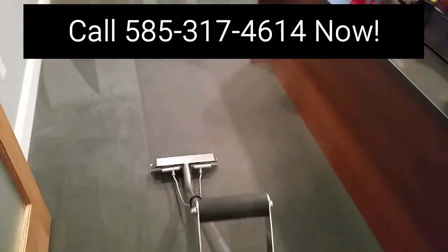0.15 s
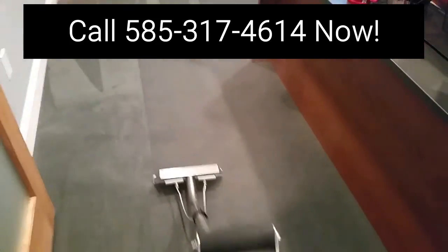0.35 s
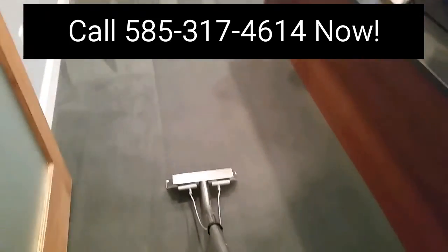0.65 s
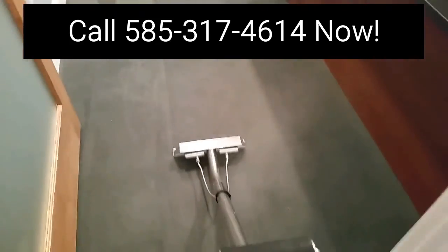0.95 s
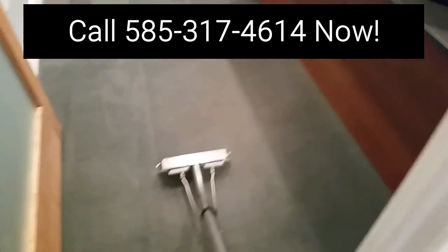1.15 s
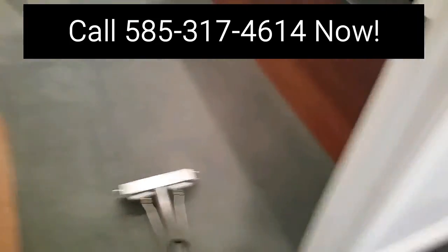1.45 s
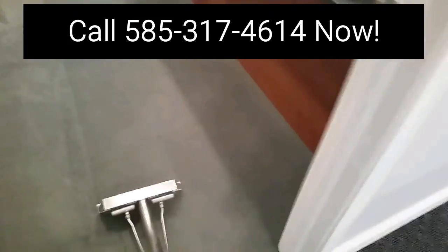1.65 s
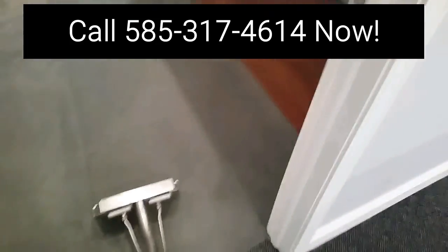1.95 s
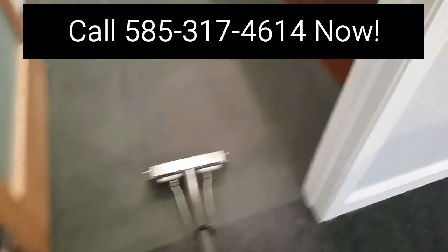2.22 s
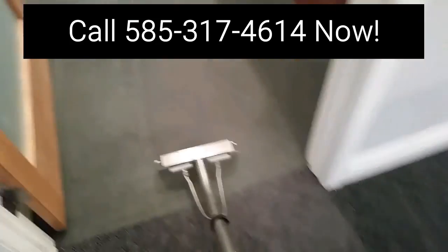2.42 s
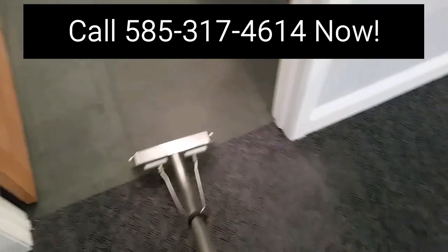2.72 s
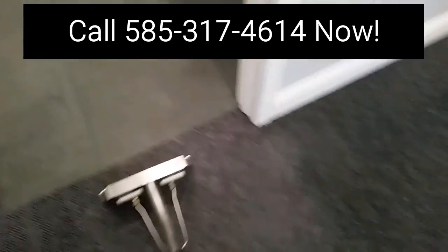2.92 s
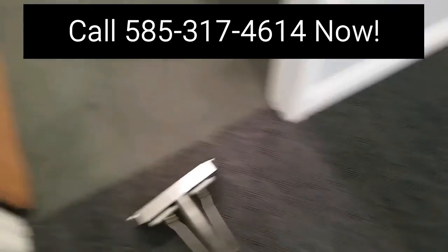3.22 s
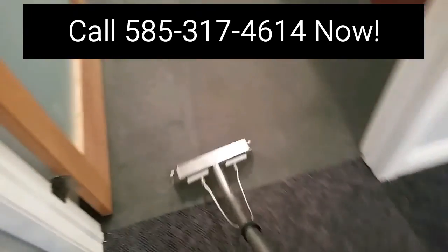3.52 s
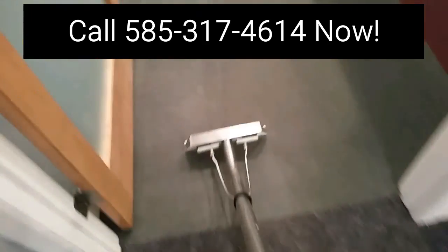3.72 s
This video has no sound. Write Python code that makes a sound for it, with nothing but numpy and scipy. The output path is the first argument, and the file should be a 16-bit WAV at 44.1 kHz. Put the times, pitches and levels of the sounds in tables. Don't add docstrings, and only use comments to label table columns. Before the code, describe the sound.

Close stereo microphone, left-heavy: steady vacuum suction with bright water spray over office carpet, one dull thump, a spray pause with juddering scrape and airy chirps, then hiss again over distant machine roar.

```python
import sys
import numpy as np
from scipy import signal
from scipy.fft import rfft, irfft, next_fast_len
from scipy.io import wavfile
from scipy.ndimage import uniform_filter1d, map_coordinates

SR = 44100
rng = np.random.default_rng(int(sys.argv[2]) if len(sys.argv) > 2 else 0)


def boost(x):
    u = np.asarray(x, float) / 20
    return 10 ** u


def log_audio(samples):
    frames = np.atleast_2d(samples).T
    limited = np.clip(frames, -1, 1)
    pcm = np.round(limited * 32767).astype(np.int16)
    wavfile.write(sys.argv[1], SR, pcm)


N = 170667

# (time [s], airflow [dB], slot resonance [Hz], resonance strength [dB])
AIRFLOW = [(0, -22.5, 1960, 15), (.9, -20.5, 2070, 5), (1.7, -21.5, 2180, 10), (2.3, -18.5, 2370, 0.5),
           (2.62, -20.5, 2300, -0.5), (2.7, -19, 2250, 6), (2.78, -21.5, 2300, 9), (2.87, -24, 2060, 12),
           (2.92, -19.5, 2120, 2), (3., -19, 2100, 2.5), (3.05, -23, 2200, 3), (3.19, -24.5, 2300, 4),
           (3.23, -28.5, 2320, 2), (3.3, -22.5, 2250, -1), (3.37, -21.5, 2200, 4), (3.43, -20, 2120, 3.5),
           (3.5, -21.5, 2090, 5), (3.87, -20, 2140, 1)]
# (frequency [Hz], likeness [0-1])
LIKENESS = [(60, 0.78), (130, 0.81), (290, 0.76), (630, 0.58), (1390, 0.32), (3040, 0.2), (6670, 0.11),
            (9000, .03)]


def unit(x):
    return x / np.sqrt(np.mean(x ** 2) + 1e-20)


def along(points, hz):
    f, v = np.transpose(points)
    return np.interp(np.log(hz + 1), np.log(f + 1), v)


def curves(rows, t):
    s, *cols = np.transpose(rows)
    return [np.interp(t, s, c) for c in cols]


def wobble(rate):
    knots = rng.standard_normal(int(N * rate / SR) + 4)
    return map_coordinates(knots, [np.arange(N) * rate / SR])


def filtered(x, response):
    m = next_fast_len(N + SR // 2)
    hz = np.fft.rfftfreq(m, 1 / SR)
    return irfft(rfft(x, m) * response(hz), m)[..., :N]


def bump(hz, centre_hz, width_hz):
    return 1 / (1 + (2 * (hz - centre_hz) / width_hz) ** 2)


def rush(colour, alike, patchy_db, moving_db=lambda hz, t: 0, extra=0):
    hop, comb_db = 128, 1.3
    hz, t, z = signal.stft(rng.standard_normal((2, N)) + extra, SR, nperseg=4 * hop, noverlap=3 * hop)
    hz = hz[:, None]
    patches = uniform_filter1d(rng.standard_normal(z.shape[1:]), size=6, axis=0)
    patches = uniform_filter1d(patches, size=12, axis=1)
    comb = uniform_filter1d(rng.standard_normal(z.shape[1:]), size=60, axis=1)
    gain_db = comb_db * unit(comb) + patchy_db * (0.74 + hz / 16000) * unit(patches)
    z = z * boost(gain_db + moving_db(hz, t))
    pair = signal.istft(z, nperseg=4 * hop, noverlap=3 * hop)[1][:, :N]

    def mid_side(f):
        angle = np.arccos(np.clip(along(alike, f), -1, 1)) / 2
        return boost(along(colour, f)) * np.array([np.cos(angle), np.sin(angle)])

    mid, side = filtered(pair, mid_side)
    return unit(np.array([mid + side, mid - side]))


def dip(hz, t):
    # (time [s], band gain [dB])
    echo_dip = [(0, 4), (1, -3), (2.2, -9.5), (2.6, -14), (2.9, -4), (3.2, -1.5), (3.87, -9.5)]
    return curves(echo_dip, t)[0] * bump(hz, centre_hz=587, width_hz=194)


def suction():
    # (frequency [Hz], density [dB per Hz])
    air_colour = [(250, -26), (500, -10), (1500, -10), (3000, -3), (3600, 0), (6000, -0.5), (7600, -14.5),
                  (15000, -24)]
    # (time [s], treble [dB])
    turn_away = [(2.6, -0.35), (2.72, -2.5), (2.88, -3.5), (2.97, -4.5), (3.1, 0.5), (3.2, 0), (3.3, -1),
                 (3.42, -4), (3.5, -0.5)]
    turn_hz, flutter_db = 4500, 0.7

    def resonances(hz, t):
        _, slot_hz, slot_db = curves(AIRFLOW, t)
        slot = slot_db * bump(hz, slot_hz, width_hz=280)
        pipe = 3 * bump(hz, centre_hz=4190, width_hz=480)
        treble = curves(turn_away, t)[0] / (1 + (turn_hz / (hz + 1)) ** 4)
        return slot + pipe + dip(hz, t) + treble

    flow_db = curves(AIRFLOW, np.arange(N) / SR)[0]
    flutter = flutter_db * (wobble(11) + wobble(20))
    return boost(flow_db + flutter) * rush(air_colour, LIKENESS, patchy_db=1.07, moving_db=resonances)


def spray():
    # (time [s], length [s], level [dB])
    valve_open = [
        (-.3, 2.96, -19.5),
        (3.468, .8, -21.5),
    ]
    # (frequency [Hz], density [dB per Hz])
    spray_colour = [(1500, -34), (3300, -15), (5000, -5), (6000, 1), (6900, -9), (8000, -17), (11000, -15),
                    (15000, -18.5)]
    open_s, shut_s, fade_db_per_s = 0.011, 0.036, 0.84
    drops_per_s, drop_hz, drop_db = 3000, 5700, -7.5
    t = np.arange(N) / SR
    gate = np.zeros(N)
    for s, length, db in valve_open:
        opening = np.clip((t - s) / open_s, 0, 1)
        closing = np.exp(-np.clip(t - s - length, 0, None) / shut_s)
        gate += boost(db - fade_db_per_s * (t - s)) * opening * closing
    hits = (rng.random((2, N)) < drops_per_s / SR) * rng.standard_normal((2, N))
    patter = boost(drop_db) * unit(filtered(hits, lambda f: bump(f, drop_hz, drop_hz)))
    unsteady = boost(0.2 * wobble(9.2) + 0.37 * wobble(21.99))
    return gate * unsteady * rush(spray_colour, LIKENESS, patchy_db=1.13, extra=patter)


def roar():
    # (frequency [Hz], density [dB per Hz])
    roar_colour = [(20, -23), (48, 7), (75, -6), (140, -3), (300, -4.5), (420, -10), (1500, -18.5),
                   (6000, -27), (15000, -25)]
    roar_db, fade_db_per_s = -38, 0.26
    follow, follow_hz = 0.27, 700

    def moving(hz, t):
        flow_db = curves(AIRFLOW, t)[0]
        upper = (1 - bump(hz, 0, 2 * follow_hz)) * (hz < 6 * follow_hz)
        return dip(hz, t) + follow * (flow_db - flow_db.mean()) * upper

    level_db = roar_db - fade_db_per_s * np.arange(N) / SR + 2.0 * wobble(4.9)
    return boost(level_db) * rush(roar_colour, LIKENESS, patchy_db=2.0, moving_db=moving)


def knocks():
    # (time [s], peak [dB], share of full ring length)
    floor_blows = [
        (0.222, -10, 1.),
        (2.651, -22, .45),
        (3.468, -16, 0.17),
    ]
    # (frequency [Hz], level [dB], 60 dB decay [s])
    floor_ring = [(92.5, 6.5, 0.39), (113, -1.5, 0.32), (137, 9.5, 0.15), (206, 3.5, 0.096),
                  (300, -5, 0.26), (375, -1.5, 0.081), (530, -4, 0.047), (920, -1, 0.013)]
    slow_cycles, slow_hz = 2.3, 100
    out, t = np.zeros(N + SR), np.arange(SR // 2) / SR
    for s, db, share in floor_blows:
        ring = np.zeros(len(t))
        for hz, level_db, t60 in floor_ring:
            decay = boost(level_db - 60 * t / (t60 * share))
            swell = 1 - np.exp(-(t * hz ** 2 / (share * slow_cycles * slow_hz)) ** 2)
            ring += decay * swell * np.sin(2 * np.pi * hz * t)
        out[round(s * SR):][:len(t)] -= boost(db - 10.5) * ring
    return out[:N]


def drag():
    # (time [s], length [s], level at start [dB], level at end [dB], judder [Hz])
    strokes = [
        (1.87, 0.24, -41, -46, 150),
        (2.704, 0.245, -51, -35.5, 130),
        (2.938, .12, -26.5, -26.5, 119),
        (3.059, .12, -22, -25.5, 170),
        (3.179, 0.16, -35, -36, 180),
        (3.328, .12, -30, -28.5, 230),
        (3.455, 0.15, -21.5, -44, 300),
        (3.561, .08, -37, -34.5, 150),
        (3.638, 0.25, -31, -31, 270),
    ]
    # (frequency [Hz], density [dB per Hz])
    drag_colour = [(30, -32), (70, -7.5), (110, -1), (200, -4), (400, -6.5), (500, -12.5), (1000, -10.5),
                   (1800, -31)]
    # (frequency [Hz], left-right likeness [0-1])
    drag_likeness = [(60, 1), (300, 0.82), (1000, 0.23)]
    edge_s, judder_db, judder_width_hz = 0.03, 6, 98
    t = np.arange(N) / SR

    def edge(s):
        return np.clip((t - s) / edge_s, 0, 1)

    press = np.zeros(N)
    for s, length, start_db, end_db, _ in strokes:
        stroke_db = np.interp(t, [s, s + length], [start_db, end_db])
        press += boost(stroke_db) * (edge(s) - edge(s + length))
    pitch = [(s + length / 2, hz) for s, length, *_, hz in strokes]

    def judder(hz, t):
        return dip(hz, t) + judder_db * bump(hz, curves(pitch, t)[0], judder_width_hz)

    scrape = rush(drag_colour, drag_likeness, patchy_db=2.0, moving_db=judder)
    return press * unit(boost(1.4 * wobble(70)) * scrape)


def whistles():
    # (time [s], length [s], pitch [Hz], level [dB])
    lip_lifts = [
        (2.27, 0.26, 2350, -30.5),
        (2.7, 0.069, 5150, -27),
        (2.736, 0.14, 3490, -26),
        (2.893, 0.046, 1860, -23),
        (2.936, 0.098, 5300, -25),
        (3.356, 0.019, 4100, -23),
    ]
    sharpness = 7.8
    t, out = np.arange(N) / SR, 0
    for s, length, hz, db in lip_lifts:
        shared, left, right = rng.standard_normal((3, N))
        pair = np.array([shared + 1.4 * left, shared + 0.73 * right])
        band = unit(filtered(pair, lambda f: bump(f, hz, hz / sharpness)))
        swell = np.sin(np.pi * np.clip((t - s) / length, 0, 1))
        out = out + boost(db) * swell * band
    return out


def scene():
    return suction() + spray() + roar() + knocks() + drag() + whistles()


def low_pass(x):
    return signal.sosfilt(signal.butter(12, 15220, fs=SR, output="sos"), x)


def record(dry):
    # (frequency [Hz], left over right [dB])
    port_shade = [(40, 2), (200, 6.5), (1300, 8), (2300, 11.5), (3200, 14.5), (6000, 15), (7600, 4),
                  (14000, 14)]
    # (frequency [Hz], left phase ahead of right [rad])
    port_lead = [(60, -0.0048), (1100, 0.41), (2200, 0.76), (2600, 0.15), (4800, 1.2), (6600, -2.65),
                 (9000, 1.6)]
    left_db, low_hz, ceiling, top_hz = 5, 36.8, 0.7, 14600

    def ports(hz):
        left = boost(left_db + 0 * hz)
        right = boost(left_db - along(port_shade, hz)) * np.exp(-1j * along(port_lead, hz))
        low_cut = hz ** 2 / (hz ** 2 + low_hz ** 2)
        return np.array([left, right]) * low_cut

    x = filtered(dry, ports)
    x = x / (1 + np.abs(x / ceiling) ** 6) ** (1 / 6)
    mix = filtered(x, lambda hz: hz < top_hz)
    return low_pass(mix)


dry = scene()
out = record(dry)
log_audio(out)
```